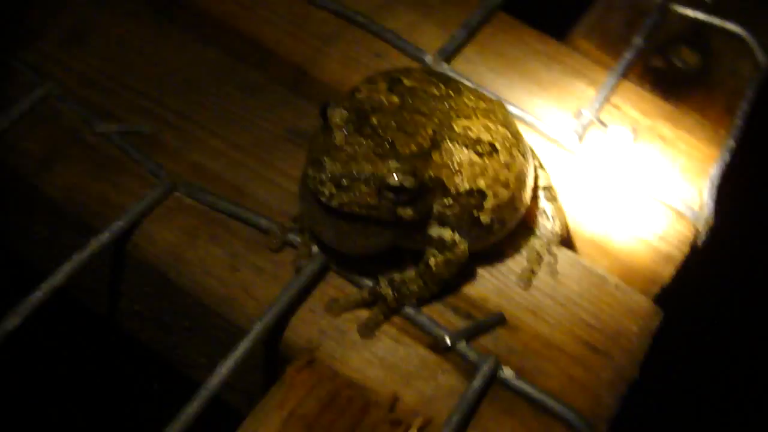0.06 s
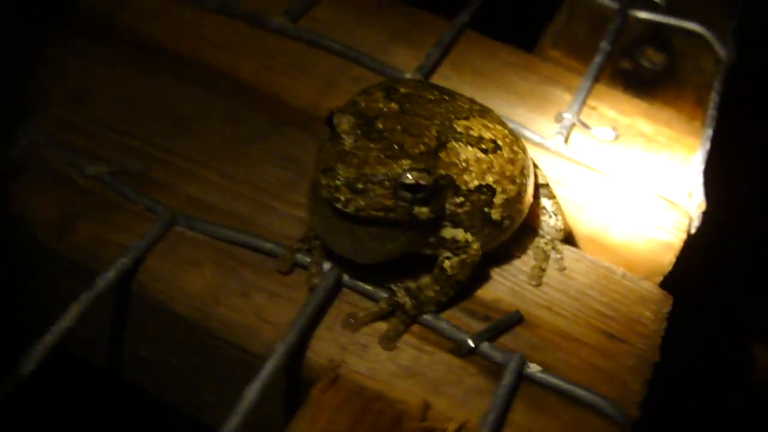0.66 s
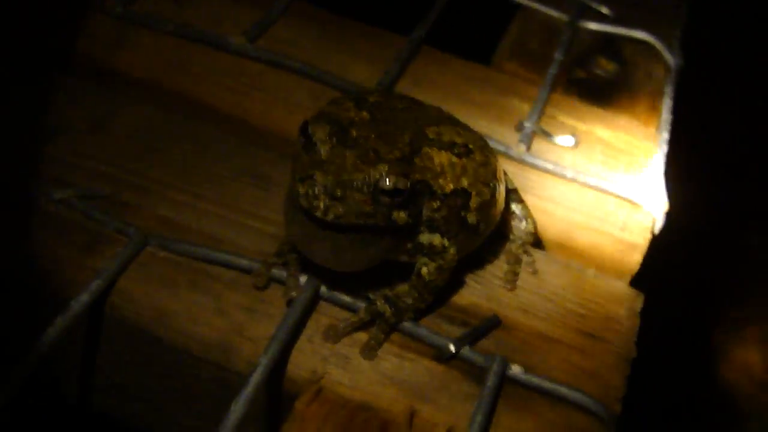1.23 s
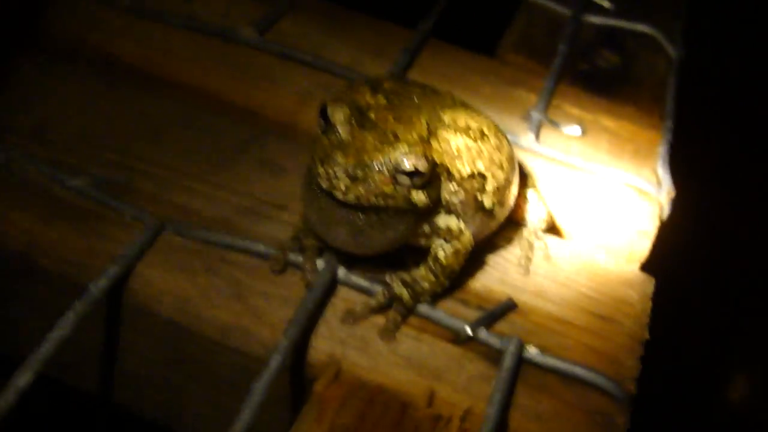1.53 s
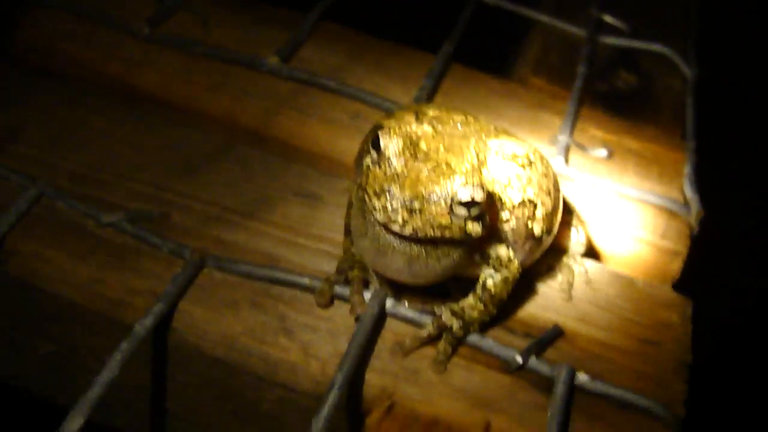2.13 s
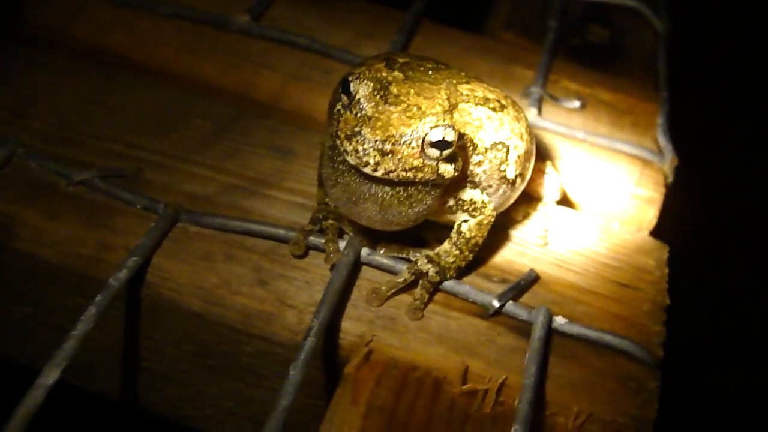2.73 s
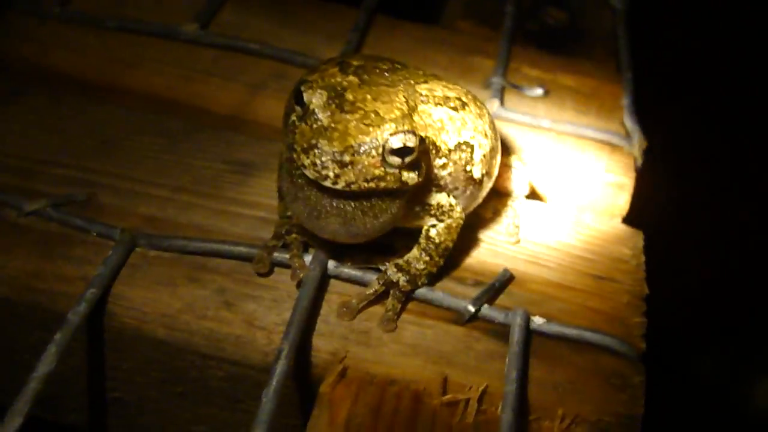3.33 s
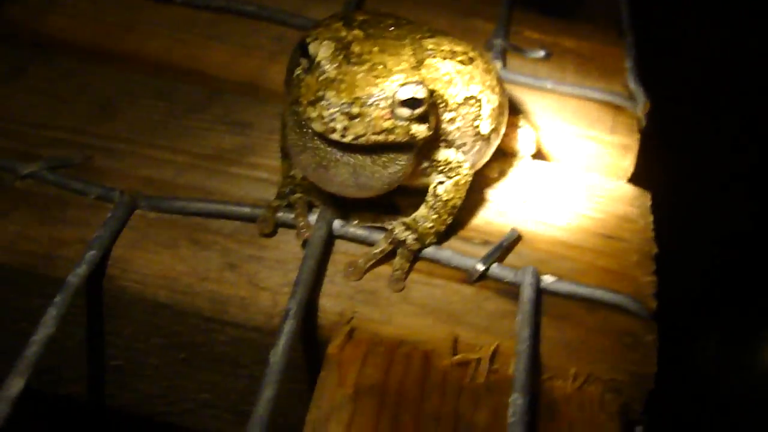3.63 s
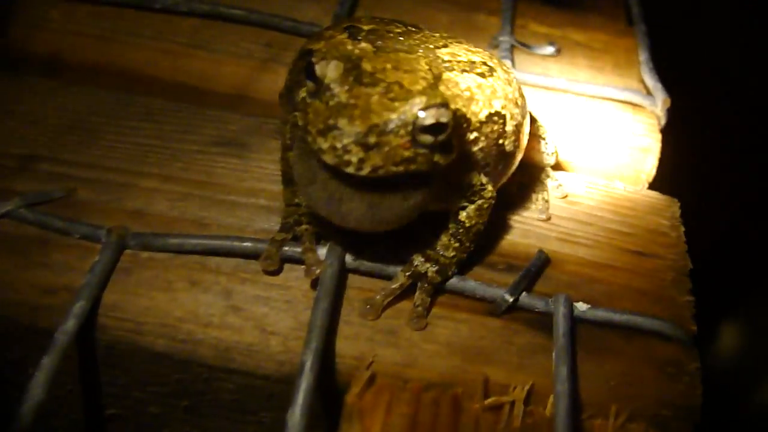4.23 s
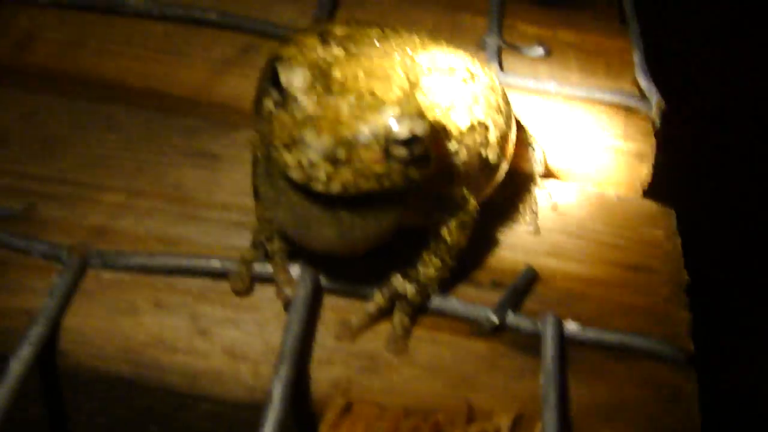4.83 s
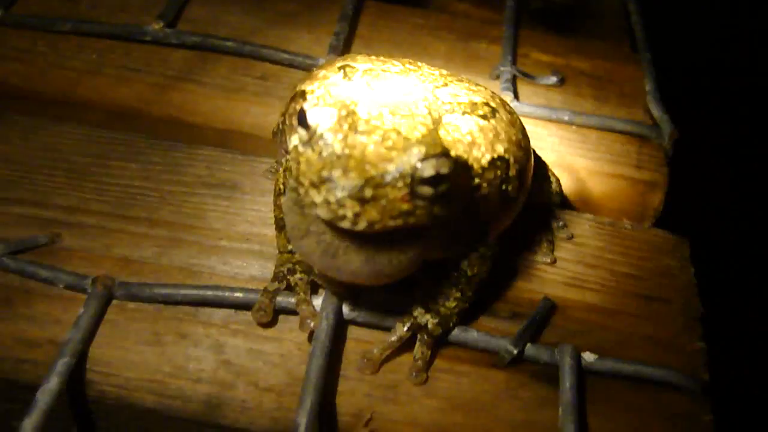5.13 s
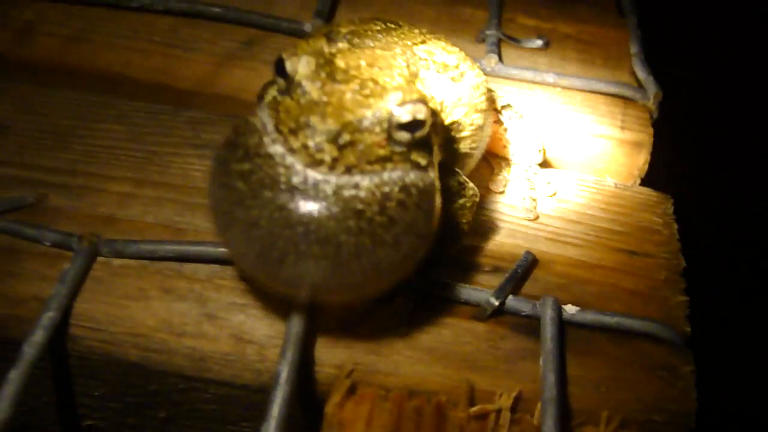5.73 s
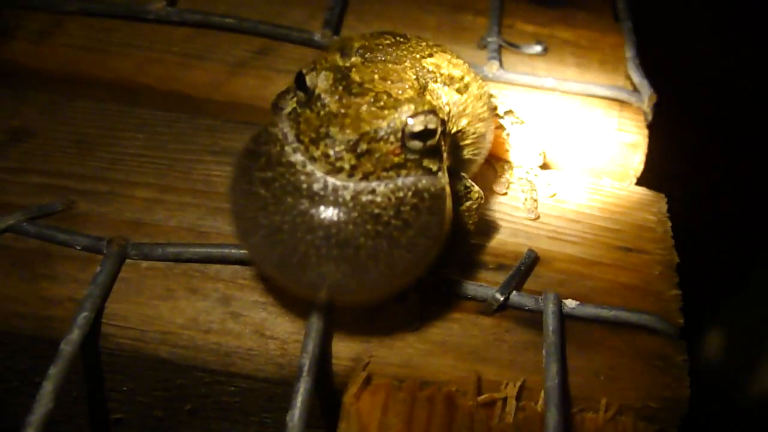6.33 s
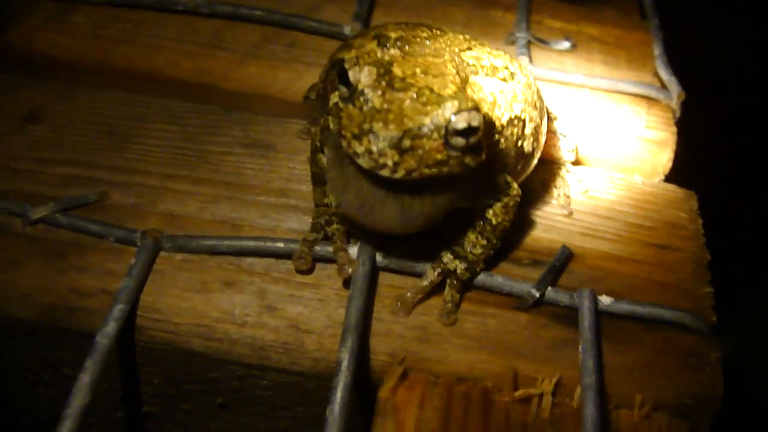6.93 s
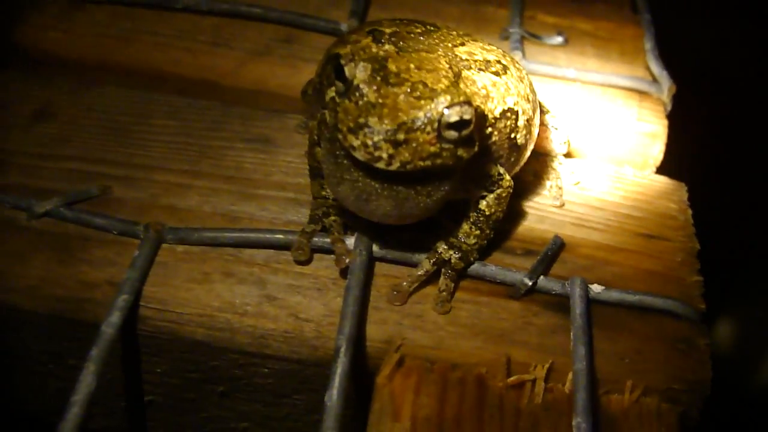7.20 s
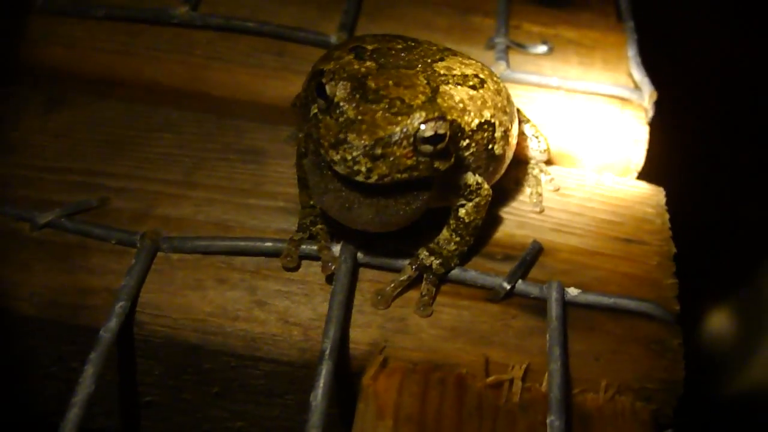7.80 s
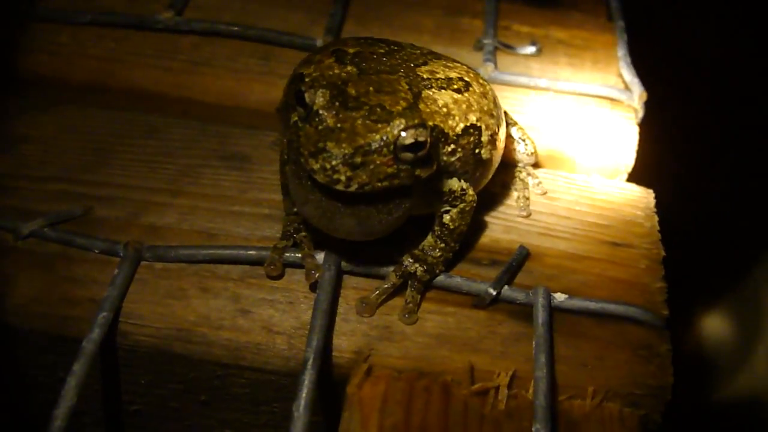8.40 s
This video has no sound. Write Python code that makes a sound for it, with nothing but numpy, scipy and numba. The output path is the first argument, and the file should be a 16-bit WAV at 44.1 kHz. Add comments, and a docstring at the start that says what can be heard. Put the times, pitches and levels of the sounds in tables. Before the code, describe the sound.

Tree frogs trill outdoors at night in separate buzzy bursts, then one very close frog gives a much louder trill over faint background noise.

```python
"""Tree frogs trill at night: one on a wooden rail right at the microphone, three more a few metres off.
Each trill is a train of short rising larynx pulses, which the resonant throat sac radiates mostly at
the octave; the yard adds echoes and reverberation. One frog squawks twice; the near one grunts first.
A pump hums under the night air, water drips, small clicks sound and a hand bumps the microphone.
Automatic gain control ducks all of it under the loudest calls."""
import sys
import numpy as np
from scipy import signal
from scipy.fft import rfft, irfft
from scipy.io import wavfile
from scipy.ndimage import uniform_filter1d, minimum_filter1d
from numba import njit

SR = 44100
rng = np.random.default_rng(int(sys.argv[2]) if len(sys.argv) > 2 else 0)


def materialize(psi):
    """Save the field psi as 16-bit PCM at rate SR to the path in sys.argv[1].

    A 1-D psi becomes a single channel; in a 2-D psi each row is a channel.
    """
    bounded = np.clip(np.atleast_2d(psi).T, -1, 1)
    quanta = np.round(bounded * 32767).astype(np.int16)
    wavfile.write(sys.argv[1], SR, quanta)


N = 377496
T = np.arange(N) / SR


def undb(db):
    """Amplitude ratio of a level in decibels."""
    return 10 ** (np.asarray(db) / 20)


def level(x, db):
    """Normalisation to an rms level."""
    return x * undb(db) / np.sqrt(np.mean(x ** 2))


def add(out, s, x):
    """Superposition of x on out from time s on."""
    start = int(round(s * SR))
    i, j = np.clip([start, start + len(x)], 0, N)
    out[i:j] += x[i - start:j - start]


def band(x, hz, width_hz, order=1):
    """Resonance: a band-pass about a geometric centre frequency."""
    low = np.hypot(hz, width_hz / 2) - width_hz / 2
    edges = [low, min(low + width_hz, SR / 2 - 100)]
    return signal.sosfilt(signal.butter(order, edges, "band", fs=SR, output="sos"), x)


def walk(rate):
    """Slow random modulation: smoothed noise with a spread near 1."""
    k = max(int(SR / rate), 1)
    return np.sqrt(3 / 2) * uniform_filter1d(np.repeat(rng.standard_normal(N // k + 1), k), k)[:N]


def larynx_pulse(hz, glide, attack_s, open_s, length_s=.02, shut_s=.0009, ring_db=-10.5, ring_s=.0031):
    """Driven, then free vibration, as a phasor: pitch climbs until the larynx shuts; the sac rings on."""
    t = T[:int(length_s * SR)]
    shut = np.maximum(t - open_s, 0)
    attack = np.sin(np.pi / 2 * np.minimum(t / attack_s, 1))
    closure = (1 - undb(ring_db)) * np.exp(-(shut / shut_s) ** 2)
    ringing = undb(ring_db) * np.exp(-shut / ring_s)
    fade_out = np.minimum((length_s - t) / ring_s, 1) ** 2
    pitch = hz * (1 + glide * np.minimum(t / (open_s + shut_s), 1) ** 1.9)
    return attack * (closure + ringing) * fade_out * np.exp(2j * np.pi * np.cumsum(pitch) / SR)


def trill(trills, voice, pitch_hz, glide, attack_s, open_s, damping, rasp_db,
          drag_s=.003, flat_start=.032, jitter=.007, scatter_db=.5):
    """Source and filter: each harmonic of a larynx pulse train excites its own body or sac resonance."""
    larynx, loudness = np.zeros(N, complex), np.zeros(N)
    for first, last, count, slowing, db, swell in trills:
        # the train slows, drags at its end, swells and tightens up to pitch
        u = np.linspace(0, 1, count)
        drag = drag_s * np.exp(-np.arange(count)[::-1] / 2)
        times = first + (last - first) * (u - slowing * u * (1 - u)) + drag
        effort = 1 - np.exp(-((times - first + .023) / swell) ** 2)
        tension = 1 - flat_start * np.exp(-(times - first) / .18)
        for s, push, tight, (size, bend) in zip(times, effort, tension, rng.standard_normal((count, 2))):
            pulse = larynx_pulse(pitch_hz * tight * (1 + jitter * bend), glide, attack_s, open_s)
            add(larynx, s, pulse)
            add(loudness, s, np.full(len(pulse), push * undb(db + scatter_db * size)))
    drive, phase = abs(larynx), np.angle(larynx)
    # air rasps through the larynx only while it is driven hard
    out = undb(rasp_db) * loudness * drive ** 2 * band(rng.standard_normal(N), 4400, 3600)
    for k, (hz, width, db) in enumerate(voice, 1):
        fade = damping if k == 1 else min(k / 2, 1.4)  # overtones die sooner than the fundamental
        out += undb(db) * band(loudness * drive ** fade * np.sin(k * phase), hz, width)
    return out


def yard(x, echoes, wet_db, t60=.71):
    """Reflection: hard echoes from boards and ground, then a diffuse tail from trees and walls."""
    out = x.copy()
    reflected = band(x, 3500, 5000, order=2)  # narrow boards favour the overtones
    for delay, db in echoes:
        add(out, delay, undb(db) * reflected)
    t = T[:SR]
    tail = rng.standard_normal(SR) * np.exp(-np.log(1000) * t / t60) * np.minimum(t / .015, 1)
    return out + undb(wet_db) * signal.fftconvolve(x, tail / np.linalg.norm(tail))[:N]


# trills: first pulse t/s, last pulse t/s, pulse count, slowing share, level/dB, swell time/s
HIGH_TRILLS = [(-.3, .318, 32, 0.04, -3.5, .04), (1.435, 2.1, 34, 0.044, -7.5, 0.065),
               (3.015, 3.682, 35, .035, -2.5, 0.0088), (5.487, 6.05, 30, 0.026, -8.5, 0.034)]
# body and sac resonances, one per harmonic: f/Hz, width/Hz, gain/dB
HIGH_RESONANCES = [(1518, 278, -6.5), (2605, 410, -2.5), (3740, 170, -20), (4890, 140, -35.5),
                   (6360, 500, -47.5), (7640, 400, -44), (8700, 670, -35)]
# echoes: delay/s, gain/dB
HIGH_ECHOES = [(.00694, -5.5), (0.0151, 0)]
def high_frog():
    """Resonance sets timbre: the highest-tuned sac, heard with the most reverberation."""
    call = trill(HIGH_TRILLS, HIGH_RESONANCES, pitch_hz=1091.4, glide=.269, attack_s=.005,
                 open_s=.00733, damping=.52, rasp_db=-33)
    return yard(call, HIGH_ECHOES, wet_db=-8.5)


# trills, resonances and echoes: columns as for the high frog
LOW_TRILLS = [(-.0947, .5853, 36, .035, -10, .02), (2.8505, 3.8755, 55, .04, -5, 0.044)]
LOW_RESONANCES = [(1453, 394, -4.5), (2423, 334, -1), (3596, 144, -18), (4800, 180, -36),
                  (5870, 650, -46.5), (7460, 130, -28), (8330, 113, -20.5), (9530, 56, -30)]
LOW_ECHOES = [(.0053, -6.5), (0.0118, -0.5), (.031, -10)]
def low_frog():
    """Frequency modulation: these pulses start lowest and glide furthest. This frog also squawks."""
    call = trill(LOW_TRILLS, LOW_RESONANCES, pitch_hz=1087.4, glide=.3, attack_s=.0043,
                 open_s=.0079, damping=.96, rasp_db=-38, flat_start=.047)
    return yard(call + squawks(), LOW_ECHOES, wet_db=-12.5)


# spectrum of the night air: f/Hz, relative density level/dB
AIR_SPECTRUM = [(30, -43), (100, -18), (190, -15), (320, -4.5), (470, -12), (700, -2.5), (1100, -11.5),
                (1550, -3), (2000, -3), (2900, -7.5), (4500, -19.5), (8000, -27.5), (10800, -30)]
def night_air():
    """Spectral shaping: broadband noise whose level wavers."""
    hz, db = np.transpose(AIR_SPECTRUM)
    bins = np.maximum(np.arange(N // 2 + 1) * SR / N, 1)
    shape = undb(np.interp(np.log(bins), np.log(hz), db))
    air = irfft(rfft(rng.standard_normal(N)) * shape, N)
    return level(air, -38.5) * undb(2 * walk(16))


# resonances of the yard's murmur: f/Hz, width/Hz, rms level/dB
MURMUR_BANDS = [(259, 140, -63), (928, 32, -59), (1117, 285, -40.5), (1843, 48, -48.5), (1946, 140, -48.5)]
def murmur():
    """Resonances excited by noise, each wavering on its own."""
    return sum(level(band(rng.standard_normal(N), hz, width, order=2), db) * undb(2 * walk(19))
               for hz, width, db in MURMUR_BANDS)


# partials of the pump: f/Hz, rms level/dB
PUMP_PARTIALS = [(120, -59), (180, -60.5), (240, -58), (300, -53), (360, -57), (720, -54.5)]
def pump():
    """Harmonic series: multiples of 60 Hz that drift slightly in level and phase."""
    return sum(np.sqrt(2) * undb(db + .42 * walk(13)) * np.sin(2 * np.pi * hz * T + .22 * walk(3.5))
               for hz, db in PUMP_PARTIALS)


def trickle():
    """Amplitude modulation: a fine trickle flickers in four treble bands, partly in step."""
    out, splash_db = np.zeros(N), 2.5 * walk(35)
    for hz, db in [(3700, -50), (5900, -53), (7800, -55.5), (9400, -58)]:
        hiss = band(rng.standard_normal(N), hz, 1400, order=2)
        out += level(hiss * undb(splash_db + 2.8 * walk(70)), db)
    return out


def impacts(events, decay_s, width_hz, order):
    """Transient excitation: each event is a decaying noise burst through a resonance."""
    out, t = np.zeros(N), T[:SR // 10]
    for s, db, hz in events:
        burst = band(rng.standard_normal(len(t)) * np.exp(-t / decay_s), hz, width_hz, order)
        add(out, s, undb(db) * burst / abs(burst).max())
    return out


# water drops: t/s, peak level/dB, f/Hz
DRIPS = [(0.9378, -27.5, 2780), (1.1598, -22, 2950), (2.3044, -26, 3000), (4.024, -24, 2850),
         (5.4327, -27, 3100), (6.7477, -24.5, 2640), (6.8944, -28, 2860), (7.0674, -20.5, 2770),
         (8.042, -24, 3470), (8.2733, -22, 2880)]
def drips():
    """A narrow resonance gives each drop a pitched plink."""
    return impacts(DRIPS, decay_s=.0087, width_hz=320, order=2)


# small clicks: t/s, peak level/dB
CLICKS = [(0.978, -22), (1.11, -20), (2.3, -19), (2.7585, -9.5), (7.802, -22)]
def clicks():
    """A brief transient has a broad spectrum, here centred on 2 kHz."""
    return impacts([(s, db, 2000) for s, db in CLICKS], decay_s=.001, width_hz=5300, order=1)


# trills, resonances and echoes: columns as for the high frog
CLEAR_TRILLS = [(1.205, 1.6555, 24, 0.038, -6, 0.048), (4.2935, 4.8215, 28, 0.031, -6.5, 0.049),
                (7.164, 7.6515, 26, 0.03, -6, 0.047)]
CLEAR_RESONANCES = [(1422, 170, -9), (2366, 490, -1.5), (3740, 370, -28.5), (4970, 270, -43.5)]
CLEAR_ECHOES = [(.00682, -6), (0.0106, -14.5)]
def clear_frog():
    """Few partials make a clear tone: this frog radiates only four harmonics."""
    call = trill(CLEAR_TRILLS, CLEAR_RESONANCES, pitch_hz=1147, glide=.21, attack_s=.0044,
                 open_s=.0077, damping=.74, rasp_db=-35)
    return yard(call, CLEAR_ECHOES, wet_db=-11)


# handling bumps: t/s, peak level/dB, f/Hz
BUMPS = [(1.37, -25, 520), (1.379, -27, 760), (3.215, -25, 632), (4.707, -26, 525), (4.764, -29, 444),
         (4.808, -28, 420)]
def bumps():
    """Structure-borne sound: knocks of the hand excite a low resonance."""
    return impacts(BUMPS, decay_s=.0097, width_hz=450, order=2)


# the low frog's squawks: t/s, length/s, f/Hz, fractional pitch rise, level/dB
SQUAWKS = [(4.323, .084, 1005, .115, -15), (4.605, 0.092, 1018, -.05, -20.5)]
# their spectrum, from the fundamental up: relative level/dB
SQUAWK_HARMONICS = [-3.5, -0.5, -18, -30.5, -41, -36, -34, -29]
def squawks(attack_s=.013, release_s=.0066):
    """Sustained oscillation: the larynx runs on without pulsing, roughened by jitter and shimmer."""
    out = np.zeros(N)
    for s, length, hz, rise, db in SQUAWKS:
        held = np.clip(T - s, 0, length)
        pitch = hz * (1 + rise * held / length) * (1 + .032 * walk(800))
        phase = 2 * np.pi * np.cumsum(pitch) / SR
        envelope = np.minimum(held / attack_s, 1) * np.exp(-np.maximum(T - s - length, 0) / release_s)
        tone = sum(undb(d) * np.sin(k * phase) for k, d in enumerate(SQUAWK_HARMONICS, 1))
        out += envelope * undb(db + 2.2 * walk(250)) * tone
    return out


# grunts while the near frog's sac fills: t/s, f/Hz, level/dB, relative rasp level/dB
GRUNTS = [(5.548, 900, -12, -16.5), (5.572, 968, 2.5, -20.5), (5.5950, 1070, -0.5, -24),
          (5.6129, 1064, 1.5, -22), (5.6318, 1062, 5, -19), (5.65, 1116, 5.5, -18)]
def grunts(octave_db=-8, damping=.6):
    """Radiation from a slack sac: short raspy pulses, mainly at the fundamental."""
    out = np.zeros(N)
    for s, hz, db, rasp_db in GRUNTS:
        pulse = larynx_pulse(hz, glide=.098, attack_s=.0008, open_s=.004)
        fundamental = abs(pulse) ** damping * np.sin(np.angle(pulse))
        tone = band(fundamental + undb(octave_db) * np.imag(pulse ** 2), 1800, 1900)
        rasp = abs(pulse) ** 4 * level(band(rng.standard_normal(len(pulse)), 2100, 2100), rasp_db)
        add(out, s, undb(db) * (tone + rasp))
    return out


# trill, resonances and echo: columns as for the high frog
NEAR_TRILLS = [(5.6486, 6.4415, 42, 0.024, 12, 0.025)]
NEAR_RESONANCES = [(1360, 700, -15.5), (2287, 590, -1.5), (3300, 1300, -21.5), (4660, 1000, -34),
                   (5600, 900, -52.5), (6940, 400, -44), (9300, 160, -36)]
NEAR_ECHOES = [(.0148, -24)]
def near_frog():
    """Direct sound dominates close to a source: the frog on the rail is loud and almost dry."""
    call = trill(NEAR_TRILLS, NEAR_RESONANCES, pitch_hz=1108.5, glide=.202, attack_s=.002,
                 open_s=.0063, damping=.57, rasp_db=-33, drag_s=.00195, flat_start=.016)
    return yard(grunts() + call, NEAR_ECHOES, wet_db=-24.5)


# slow swell applied to air, murmur, pump and trickle: t/s, gain/dB
BACKGROUND_SWELL = [(0, -6.5), (1.4, 1.5), (5.3, 0.5), (6.7, -1), (8.5, 2)]
def scene():
    """Superposition of all sources at one microphone."""
    frogs = high_frog() + low_frog() + clear_frog() + near_frog()
    background = night_air() + murmur() + pump() + trickle()
    swell = undb(np.interp(T, *np.transpose(BACKGROUND_SWELL)))
    return (frogs + background * swell + drips() + clicks() + bumps())[None]


@njit
def follow(x, attack, release):
    """Envelope detection: a one-pole lag with separate rates of rise and fall."""
    out, e = np.empty(len(x)), 0.
    for i in range(len(x)):
        e += (x[i] - e) * (attack if x[i] > e else release)
        out[i] = e
    return out


def record(dry, knee_db=-7, ratio=1.59, attack_s=.0005, release_s=.066, ceiling=.99, top_hz=11000):
    """Compression: gain control ducks loud peaks; quadratic distortion and a low-pass follow."""
    hold, ahead = SR // 40, SR // 1000  # 25 ms peak hold, 1 ms look-ahead
    held = -minimum_filter1d(-abs(dry[0]), hold, origin=hold // 2 - ahead)
    peak = np.maximum(follow(held, 1 / (attack_s * SR), 1 / (release_s * SR)), undb(knee_db))
    ducked = dry * np.minimum((peak / undb(knee_db)) ** (1 / ratio - 1), ceiling / peak)
    bent = ducked + undb(-38) * band(ducked ** 2, 880, 6000)
    low_pass = signal.ellip(10, .2, 70, top_hz, fs=SR, output="sos")
    return signal.sosfilt(low_pass, np.clip(bent, -1, 1))


dry = scene()
out = record(dry)
materialize(out)
```